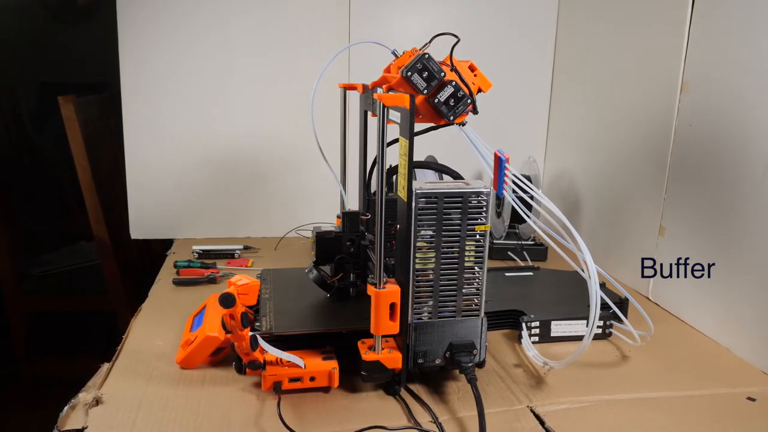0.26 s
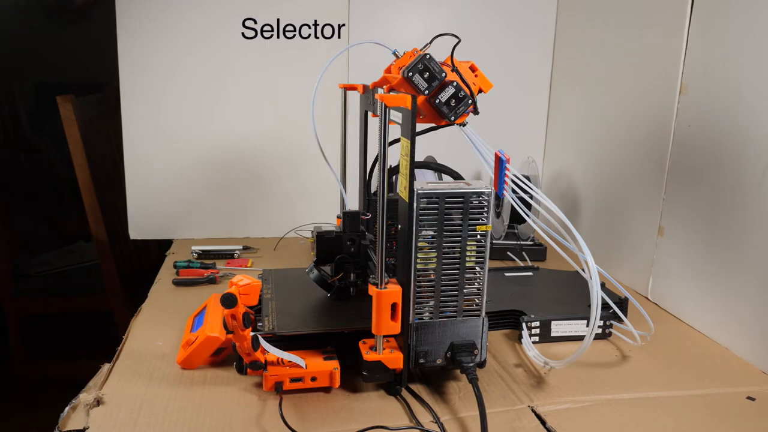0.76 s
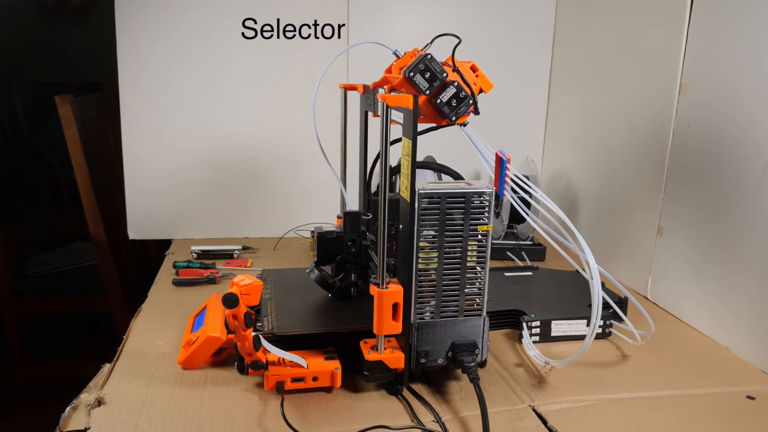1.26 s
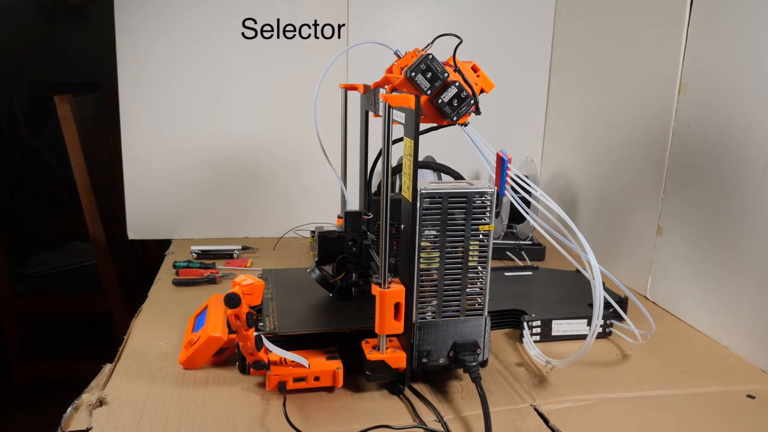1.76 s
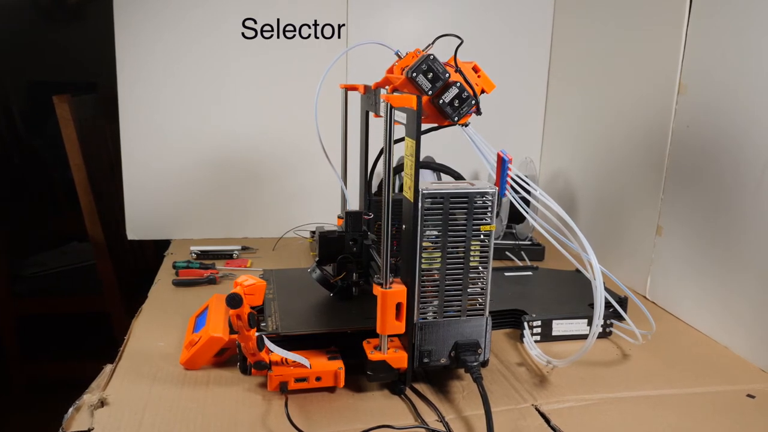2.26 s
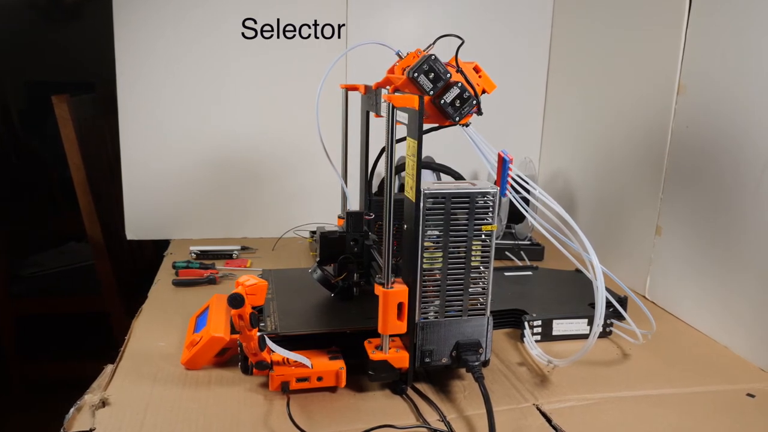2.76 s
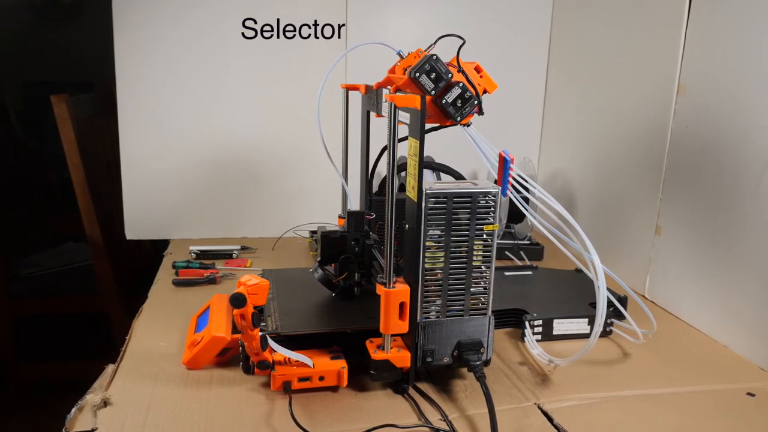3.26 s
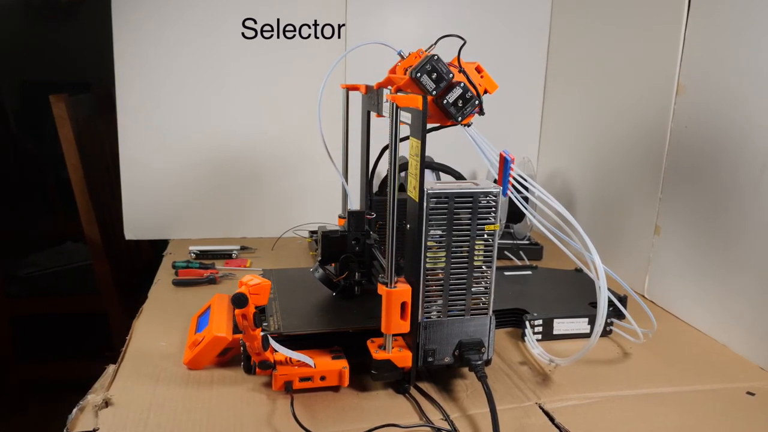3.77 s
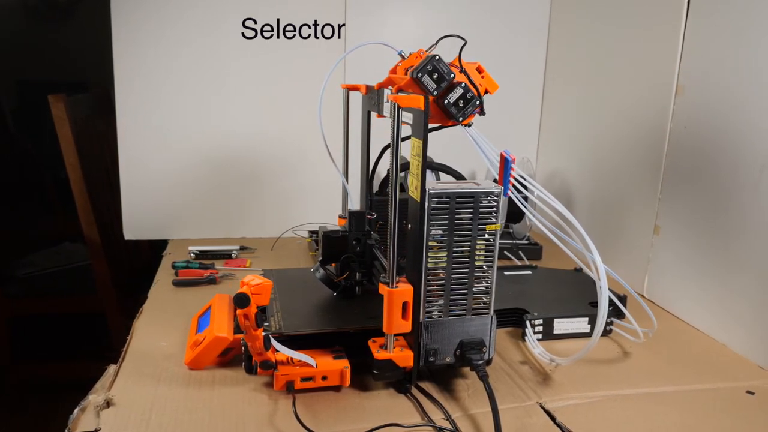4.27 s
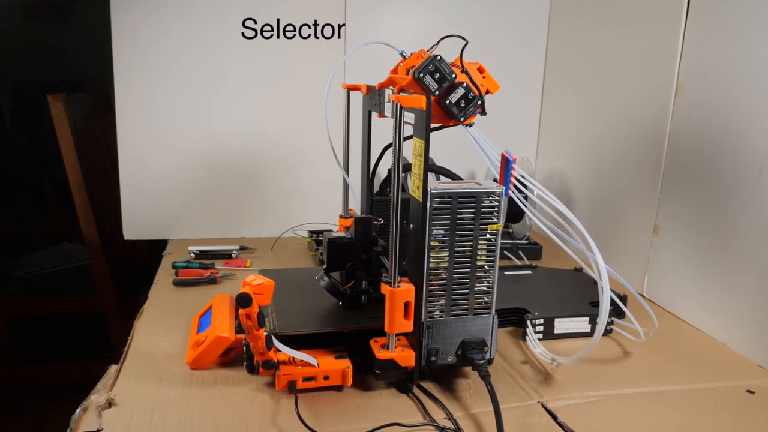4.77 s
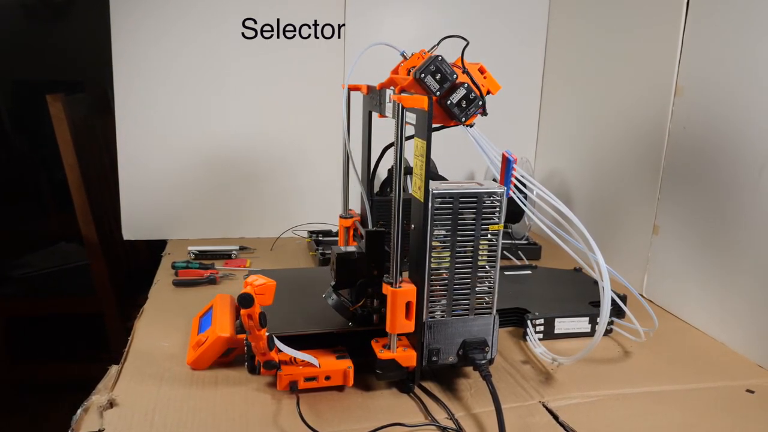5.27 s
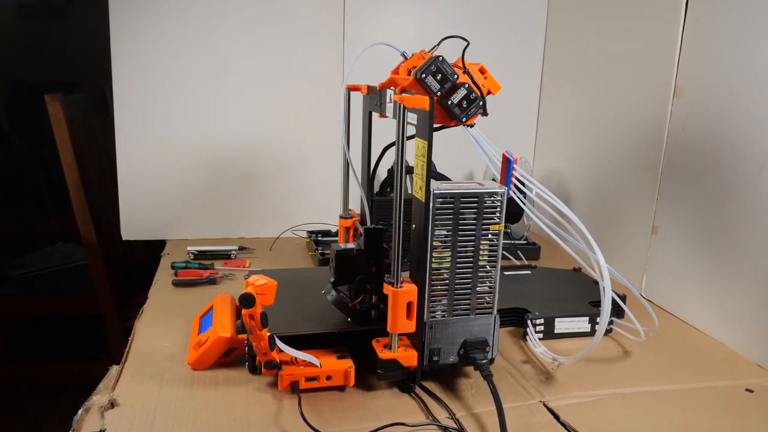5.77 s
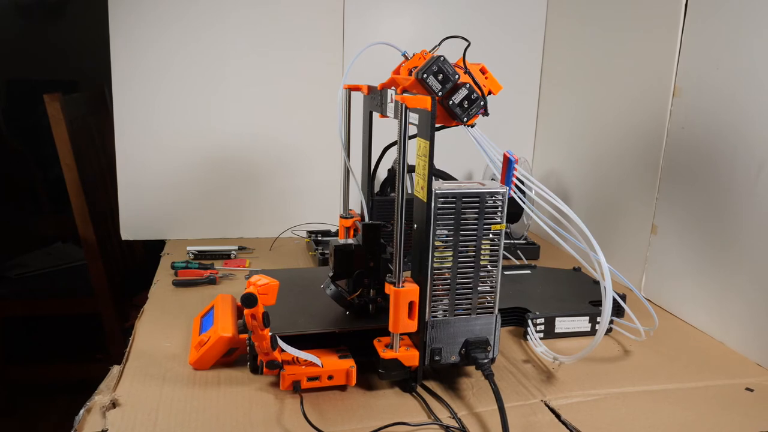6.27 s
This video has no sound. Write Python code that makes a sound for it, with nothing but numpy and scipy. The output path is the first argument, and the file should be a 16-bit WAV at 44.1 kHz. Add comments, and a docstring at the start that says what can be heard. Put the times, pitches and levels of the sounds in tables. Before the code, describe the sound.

A 3D printer on a table in a quiet small room: stepper motors give brief, uneven mid-pitched buzzes, mixed with dry plastic clicks and faint scrapes over a soft fan rush. Late on, one louder, faster move rasps up, whines steadily with bright bearing rattle, slows and stops in a hard double-pitched judder. A faint low motor hum and the fan remain. Close stereo pickup, strongly left.

```python
"""Stepper motors of a 3D printer on a table in a small room: short moves buzz through the frame as runs of sines.
One fast travel adds motor rasp on the ramps, a step tone and bearing rattle at cruise; the axes stop with a judder.
Filament feed: noise clicks through plastic resonances, rough scrapes. Drivers: thin hiss and gliding whistles.
Background: fan of shaped noise with faint tones; a slow motor hums on two orders at the end."""
import sys
import numpy as np
from scipy import signal
from scipy.fft import rfft, irfft
from scipy.io import wavfile
from scipy.ndimage import uniform_filter1d

SR = 44100
rng = np.random.default_rng(int(sys.argv[2]) if len(sys.argv) > 2 else 0)


def store_pcm(level_fs):
    """Save levels as 16-bit WAV."""
    pcm = np.round(np.clip(level_fs, -1, 1) * 32767).astype(np.int16)
    wavfile.write(sys.argv[1], SR, np.atleast_2d(pcm).T)


N = 287514
T = np.arange(N) / SR
BINS_HZ = np.maximum(np.arange(N // 2 + 1) * SR / N, 1)

# light carriage twitches: t/s, length/s, f/Hz, level/dB, fade per stroke/dB
TWITCHES = [(0.106, .048, 571, -42.5, 1), (0.171, .042, 572, -46, -1.5), (0.249, .037, 569, -40.5, 0),
            (.297, 0.024, 560, -45, -2), (.385, 0.019, 565, -45, 0), (.413, 0.027, 562, -40.5, 0),
            (.553, .028, 558, -46, 0), (.595, 0.035, 565, -42.5, 0), (.715, 0.029, 560, -43, -5),
            (1.164, 0.022, 605, -38.5, 0), (1.185, .05, 573, -37, 8.5), (1.262, 0.033, 564, -43, 0),
            (1.37, 0.058, 561, -52, -1), (1.593, 0.0165, 558, -40, 0), (1.613, .045, 570, -38, 3),
            (2.043, .062, 570.6, -39.5, 2.5), (2.124, 0.035, 568, -38.5, 0), (2.178, 0.026, 587, -47, 0),
            (2.29, 0.072, 565, -55, -2), (2.756, 0.023, 577.6, -36, 0), (2.785, 0.033, 583, -50.5, 0),
            (2.865, .061, 561, -50.5, -0.5), (3.051, 0.028, 580, -39.5, 0), (3.096, .024, 561, -37, 0),
            (3.119, .044, 550, -44, 6), (3.315, 0.051, 564, -38, -0.5), (3.459, 0.029, 557, -40.5, 0),
            (3.519, .041, 558, -36, 6), (3.69, .08, 566, -48.5, 0), (3.85, 0.067, 572, -43.5, -0.5),
            (3.971, .033, 562.4, -42, 0), (4.165, 0.029, 607, -45.5, 0), (4.219, 0.069, 560.2, -34, 5),
            (4.391, 0.032, 556, -36.5, 0), (4.436, 0.03, 564, -37, 0), (4.73, .068, 552, -37, 1),
            (4.86, .1, 551, -38, 0), (5.032, 0.083, 561.6, -38, -1.5)]
# heavy bed lurches: t/s, length/s, level/dB
LURCHES = [(0.386, 0.032, -41.5), (0.641, 0.051, -48), (0.898, 0.036, -46.5), (1.385, 0.022, -41),
           (1.594, 0.028, -46), (1.806, 0.044, -41.5), (3.327, 0.016, -46.5), (3.512, .026, -43.5),
           (4.33, 0.033, -41.5), (4.4, 0.032, -43), (4.664, 0.055, -43), (5.156, 0.028, -37),
           (5.246, 0.018, -40)]
# both axes stop hard and judder: t/s, length/s, carriage level/dB, bed level/dB
JUDDER = [(5.457, 0.0078, -27.5, -26.5), (5.474, 0.016, -42, -25.5), (5.496, 0.0148, -34, -28)]
# parts chattering along with a move: f/Hz, width/Hz, level/dB
LOOSE_PARTS = [(610, 26, 3.5), (710, 28.6, 0.5), (761, 16, -5), (945, 80, -10.5), (1152, 30, -18)]
# frame resonances: f/Hz, width/Hz, level/dB
FRAME_LOW = [(155.5, 15.3, -9.5), (238.3, 10.4, 2), (294.3, 22.7, -4.5)]
FRAME_HIGH = [(432, 14.7, -5.5), (455, 13, -29), (562.4, 16.6, 11), (643, 19.6, 0), (710, 43, -4),
              (961, 73, -14.5), (1119, 44, -8)]
# frame trembling, before gain: t/s, upper modes level/dB, low modes level/dB
TREMBLE = [(0.0, -70.5, -68), (0.14, -63, -70), (0.29, -66.5, -75), (0.6, -56, -65), (0.87, -69, -68),
           (1.18, -72, -66.5), (1.37, -64, -66.5), (1.89, -65.5, -64), (2.21, -59, -64), (2.54, -72, -66.5),
           (3.33, -63, -66), (3.75, -62.5, -62.5), (4.09, -53.5, -56.5), (4.49, -60.5, -59),
           (4.72, -52.5, -51.5), (4.93, -51.5, -56.5), (5.14, -51.5, -53), (5.8, -70, -62.5)]
STROKE_S, STROKE_GAP_S = 0.025, 0.0018  # a twitch is a run of strokes about this long
BED_HZ, JUDDER_CARRIAGE_HZ, JUDDER_BED_HZ = 245.4, 576, 265.1
SHAKE_T60_S = 0.1  # frame settling after each move
CREEP_FADE_S = 0.4  # low trembling dies away once the axes have stopped

# fast travel; speed in full steps per s
TRAVEL_START_S, TRAVEL_END_S = 4.487, 5.335
ACCEL_HZ_PER_S, CRUISE_HZ = 5500, 1091
WHINE_ON_S, WHINE_OFF_S, WHINE_EDGE_S = 4.683, 5.155, 0.037
# step tone at cruise: t/s, level/dB
WHINE = [(4.71, -33), (4.904, -39), (5.062, -37), (5.14, -38.5)]
# step tone orders: multiple of speed, relative level/dB
STEP_ORDERS = [(1, 0), (2, -37), (7, -34)]
# bearing rattle spectrum: f/Hz, relative density/dB per Hz
BEARINGS = [(1300, -12), (1600, -15), (2400, -13), (2750, -3), (3300, -2.5), (3950, -1.5), (4250, -12.5),
            (4700, -24), (5200, -33), (6300, -16), (7300, -28), (8500, -24), (10200, -41.5), (13000, -32.5),
            (15500, -22)]
RATTLE_DB, RATTLE_POWER = -44.5, 3.5  # at cruise; amplitude grows as this power of speed
# mounts rung by motor orders on the ramps: f/Hz, width/Hz, level/dB
RAMP_MODES = [(1444, 44, -3), (2900, 360, 0.5)]
# bed resonances rung by its groaning motor: f/Hz, width/Hz, level/dB
BED_MODES = [(146, 93, 6), (261, 30, 3), (398, 90, 1)]
ROUGH_SPEED_HZ, ROUGH_SPAN_HZ = 635, 147  # the motor runs roughest around this speed
BED_SPEED_SHARE, BED_GROAN_DB, BED_ROUGH_HZ = 0.41, -46, 80  # groan level before the bed resonances, in dB
BRAKING_DB = -7.5  # rasp and groan are softer while braking
# carriage rattling in its play on each ramp: t/s, length/s, level/dB
PLAY = [(4.603, 0.026, -47.5), (5.229, .026, -45)]
PLAY_HZ = 1456

# feed clicks: t/s, level/dB, body below 4.5 kHz against snap/dB, brightest f/Hz of the snap
CLICKS = [(0.6292, -41, -5, 7900), (0.6676, -53, 0, 7850), (1.1244, -46.5, -8.5, 6870),
          (1.2293, -41, -9, 7580), (1.339, -43.5, -5.5, 8350), (1.5817, -39.5, -7.5, 7725),
          (2.3754, -41.5, -4.5, 8030), (2.7112, -46, -7.5, 7650), (2.819, -49, -1.5, 8400),
          (3.0115, -43.5, -7.5, 8600), (3.2784, -56.5, 8, 8310), (3.4981, -40, -11, 8040),
          (3.7148, -49, -0.5, 6020), (3.7861, -44, -6, 6000), (3.931, -50.5, 2.5, 7260),
          (4.03, -47.5, -7.5, 6400), (4.134, -50.5, -3, 7200), (4.5395, -43.5, -4, 8080),
          (5.4803, -55.5, 1, 5300)]
# plastic resonances of snap and body: f/Hz, width/Hz, level/dB
SNAP_MODES = [(5020, 340, 3.5), (6250, 290, 4.5), (6870, 400, 0.5), (8160, 117, 6), (10500, 170, -29)]
BODY_MODES = [(1100, 113, 16.5), (1850, 430, 9), (2515, 230, 11.5), (3440, 380, 11.5)]
# filament rubbing in its guide: t/s, length/s, level/dB
SCRAPES = [(1.119, 0.042, -60), (1.59, 0.044, -57.5), (2.01, 0.046, -57), (2.721, 0.049, -56),
           (3.038, 0.028, -60.5), (3.277, 0.056, -62), (3.524, 0.041, -62), (3.929, 0.022, -54.5),
           (4.154, 0.36, -64)]
SCRAPE_HZ = 3297

CHOPPER_HZ = 19800  # driver switching rate
# whistles below the chopper: multiple of speed, level/dB
SIDEBANDS = [(9, -61), (11, -55.5), (13, -60.5)]
DRIVER_CRUISE_DB, DRIVER_HOLD_DB, HOLD_FADE_DB_PER_S = -64, -72, 1
NUDGE_S, NUDGE_LENGTH_S, NUDGE_SPEED_HZ, NUDGE_DB = 5.358, 0.077, 439, 7.5  # small move after the travel

# slow closing move
SLOW_HZ, SLOW_START_S, SLOW_ATTACK_S, SLOW_SETTLE_S = 134.3, 5.5, 0.021, 0.18
SLOW_KICK_DB, SLOW_FIRST_DB, SLOW_SECOND_DB = -55, -69.5, -61  # first order: initial extra, settled; second order

# spectra of fan rush and hiss: f/Hz, relative density/dB per Hz
FAN = [(18, -63), (30, -25.5), (135, -10), (187, -11.5), (250, -8.5), (353, -7), (540, -14.5), (667, -16.5),
       (874, -16), (1060, -10.5), (1960, -19.5), (2620, -26.5), (3000, -43), (3900, -65), (6600, -120)]
FAN_HISS = [(2400, -2), (2800, -3), (3100, -9), (3500, 0.5), (3800, 1.5), (4150, -6.5), (4600, -16.5),
            (6300, -20.5), (9000, -22), (10800, -26.5), (12200, -15.5), (14000, -21), (15800, -17.5)]
# fan hiss: t/s, level/dB
HISS_DB = [(0, -65.5), (2.6, -65), (5.6, -62.5), (6.52, -65.5)]
# faint fan tones: f/Hz, level/dB
FAN_LINES = [(244, -69.5), (489, -73.5), (1066, -79), (1405, -78), (2510, -79.5), (3760, -79.5)]
FAN_RUSH_DB = -65

ROOM_T60_S = 0.45
# stereo image drifting toward the middle: t/s, left minus right level/dB
IMAGE = [(4.9, 13.5), (5.4, 10.5)]
# extra lead of left over right: f/Hz, level/dB
LEFT_LEAD = [(60, -1.5), (250, 0), (560, 1), (900, 0), (1090, 2), (1400, -0.5), (5000, 0), (14000, 0)]
CUTOFF_HZ = 15830


def from_db(db):
    """Decibels to gain."""
    return 10 ** (np.asarray(db) / 20)


def rms_one(x):
    """Scale to unit power."""
    return x / np.sqrt(np.mean(x ** 2) + 1e-20)


def in_time(rows):
    """Interpolate each column over time."""
    s, *columns = np.transpose(rows)
    return [np.interp(T, s, c) for c in columns]


def on_bins(points):
    """Interpolate a spectrum on a log-frequency axis."""
    hz, value = np.transpose(points)
    return np.interp(np.log(BINS_HZ), np.log(hz), value)


def coloured(x, spectrum):
    """Shape by a spectrum that falls steeply past its ends; rms 1."""
    below = (spectrum[0][0] / BINS_HZ) ** 8
    above = (BINS_HZ / spectrum[-1][0]) ** 16
    skirts = 1 / np.sqrt((1 + below) * (1 + above))
    return rms_one(irfft(rfft(x) * from_db(on_bins(spectrum)) * skirts, N))


def drift(rate_hz):
    """Low-passed noise: smooth chance with spread 1."""
    return rms_one(irfft(rfft(rng.standard_normal(N)) / (1 + (BINS_HZ / rate_hz) ** 4), N))


def running_phase(hz):
    """Integrate a frequency curve to radians."""
    return 2 * np.pi * np.cumsum(hz) / SR


def window(start_s, end_s, edge_s):
    """Rise, hold and fall, with the edges centred on start and end."""
    return np.clip(np.minimum(T - start_s, end_s - T) / edge_s + 0.5, 0, 1)


def resonate(x, modes):
    """Parallel two-pole resonances with alternating signs."""
    out = 0
    for k, (hz, width_hz, db) in enumerate(modes):
        r = np.exp(-np.pi * width_hz / SR)
        poles = [1, -2 * r * np.cos(2 * np.pi * hz / SR), r * r]
        ring = signal.lfilter([1, 0, -1], poles, x + 1e-18)
        out = out + (-1) ** k * from_db(db) * (1 - r * r) / 2 * ring
    return out


def dense_modes(x, ring_s, share):
    """Many close resonances of rods and panels leave a fine, steady ripple in the spectrum."""
    t = T[:SR // 5]
    tail = rng.standard_normal(len(t)) * np.exp(-t / ring_s)
    return rms_one(x + share * signal.fftconvolve(x, tail / np.linalg.norm(tail))[:N])


def jolts(per_s, spread_db):
    """Random small impacts of uneven strength."""
    hits = rng.random(N) < per_s / SR
    return hits * rng.choice([-1, 1], N) * from_db(spread_db * rng.standard_normal(N))


def evened(x, size):
    """Hold the power steady over about size samples."""
    power = np.maximum(uniform_filter1d(rms_one(x) ** 2, size), 0)
    return x / np.sqrt(power + 1e-3) / np.sqrt(np.mean(x ** 2))


def short_moves(edge_cycles=4, glide=0.021, droop_db=3.0, chatter_db=-12, ring_db=-17, throb=0.1):
    """Each stroke is a run of steps that slows a little; loose parts chatter along and the frame rings on."""
    buzz, shake = np.zeros(N), np.zeros(N)
    for s, length_s, hz, db in strokes():
        edge_s = edge_cycles / hz  # the heavier, lower part is slower to start and stop
        i = np.flatnonzero(abs(T - s - length_s / 2) < length_s / 2 + edge_s)
        t = T[i] - s
        along = t / length_s - 0.5
        gate = np.clip(np.minimum(t, length_s - t) / edge_s + 0.5, 0, 1)
        level = from_db(db - droop_db * along) * np.sin(gate * np.pi / 2) ** 2
        phase = running_phase(hz * (1 - glide * along)) + rng.uniform(0, 2 * np.pi)
        buzz[i] += level * np.sin(phase)
        shake[i] += level * (hz / LOOSE_PARTS[0][0]) ** 2  # faster steps shake harder
    buzz *= 1 + throb * drift(49)
    chatter = evened(resonate(jolts(700, 0.52), LOOSE_PARTS), size=500) * shake
    ringing = np.roll(resonate(buzz, FRAME_LOW + FRAME_HIGH), round(0.012 * SR))
    return buzz + from_db(chatter_db) * chatter + from_db(ring_db) * ringing + tremble(shake)


def strokes(scatter=0.0064):
    """Split moves into strokes of carriage and bed: s, length s, Hz, dB."""
    for s, length_s, hz, db, fade_db in TWITCHES:
        count = max(1, round(length_s / STROKE_S))
        step_s = length_s / count
        for k in range(count):
            stroke_hz = hz * (1 + scatter * rng.standard_normal())
            yield s + k * step_s, step_s - STROKE_GAP_S, stroke_hz, db - k * fade_db
    for s, length_s, db in LURCHES:
        yield s, length_s, BED_HZ, db
    for s, length_s, carriage_db, bed_db in JUDDER:
        yield s, length_s, JUDDER_CARRIAGE_HZ, carriage_db
        yield s, length_s, JUDDER_BED_HZ, bed_db


def tremble(shake, high_gain_db=2, low_gain_db=1, high_stir_db=-12, low_stir_db=-18):
    """Single steps of the creeping motors nudge the frame's modes, more strongly in the wake of a move."""
    high_db, low_db = in_time(TREMBLE)
    r = from_db(-60 / (SHAKE_T60_S * SR))
    stirred = signal.lfilter([1 - r], [1, -r], shake + 1e-18)
    high = evened(resonate(jolts(220, 4.8), FRAME_HIGH), size=2200)
    low = evened(resonate(jolts(200, 2.2), FRAME_LOW), size=3000)
    creep_fade = np.exp(-np.maximum(T - SLOW_START_S, 0) / CREEP_FADE_S)
    high_level = np.hypot(from_db(high_db + high_gain_db), from_db(high_stir_db) * stirred)
    low_level = np.hypot(from_db(low_db + low_gain_db) * creep_fade, from_db(low_stir_db) * stirred)
    return high_level * high + low_level * low


def travel_speed():
    """Full steps per second: steady acceleration, cruise, steady braking."""
    return np.clip(ACCEL_HZ_PER_S * np.minimum(T - TRAVEL_START_S, TRAVEL_END_S - T), 0, CRUISE_HZ)


def travel():
    """Fast travel: step tone at cruise plus bearing rattle that grows with speed."""
    speed_hz = travel_speed()
    return step_tone(speed_hz) + bearing_rattle(speed_hz)


def step_tone(speed_hz, wobble=0.0033, edge_wobble=0.05, flutter=0.15, belt_hz=97, belt=0.18):
    """The step rate builds up in the frame at cruise; the swaying belt adds a side tone."""
    settled = window(WHINE_ON_S, WHINE_OFF_S, WHINE_EDGE_S) ** 2
    phase = running_phase(speed_hz * (1 + (wobble + edge_wobble * (1 - settled)) * drift(89)))
    tone = sum(from_db(db) * np.sin(k * phase) for k, db in STEP_ORDERS)
    tone += belt * np.sin(phase - running_phase(belt_hz * (1 + drift(23) / 10)))
    return np.sqrt(2) * from_db(in_time(WHINE)[0]) * settled * (1 + flutter * drift(110)) * tone


def bearing_rattle(speed_hz, flicker_db=1.4, patchy_db=2.5):
    """Balls of the linear bearings rattle along the rods, whose resonances come and go as the carriage slides."""
    balls = rfft(dense_modes(coloured(jolts(7000, 2.7), BEARINGS), ring_s=0.012, share=0.4))
    edges_hz = np.geomspace(1000, 16000, num=21)
    rattle = np.zeros(N)
    for low_hz, high_hz in zip(edges_hz, edges_hz[1:]):
        band = irfft(balls * (BINS_HZ >= low_hz) * (BINS_HZ < high_hz), N)
        rattle += band * from_db(patchy_db * drift(23))
    level = (speed_hz / CRUISE_HZ) ** RATTLE_POWER * from_db(RATTLE_DB + flicker_db * drift(99))
    return rms_one(rattle) * level


def ramp_rasp(rasp_db=-44, rough_hz=380, whistle_db=-53, whistle_width_hz=400, whistle_above_hz=760,
              whistle_order=6.86):
    """Under the load of changing speed, rough motor orders sweep through the mounts; the slower bed motor groans."""
    speed_hz = travel_speed()
    phase = running_phase(speed_hz)
    loaded = uniform_filter1d(1. * (speed_hz < CRUISE_HZ), size=900)
    orders = sum(drift(rough_hz) * np.sin(k * phase) for k in range(2, 7))
    roughness = np.exp(-((speed_hz - ROUGH_SPEED_HZ) / ROUGH_SPAN_HZ) ** 2)
    rasp = from_db(rasp_db) * roughness * resonate(orders, RAMP_MODES)
    fast = uniform_filter1d(1. * (speed_hz > whistle_above_hz), size=900)
    whistle = from_db(whistle_db) * fast * drift(whistle_width_hz) * np.sin(whistle_order * phase)
    bed_drive = speed_hz / CRUISE_HZ * drift(BED_ROUGH_HZ) * np.sin(BED_SPEED_SHARE * phase)
    groan = from_db(BED_GROAN_DB) * resonate(bed_drive, BED_MODES)
    braking = from_db(BRAKING_DB * (T > WHINE_OFF_S))
    return loaded * (whistle + braking * (rasp + groan))


def carriage_play(width_hz=170, edge_s=0.017):
    """A brief hollow rattle as the pull of the belt changes: narrow noise around one pitch."""
    level = sum(from_db(db) * window(s, s + length_s, edge_s) for s, length_s, db in PLAY)
    return level * drift(width_hz) * np.sin(2 * np.pi * PLAY_HZ * T)


def clicks(snap_db=2, body_db=6, attack_s=0.00054, crack_s=0.0013, tail_s=0.012, tail_db=-16,
           focus_db=8, focus_width_hz=350):
    """Plastic parts of the feed snap over and rattle briefly; each snap favours a pitch of its own."""
    out, t = np.zeros(N), T[:SR // 12]
    decay = np.exp(-t / crack_s) + from_db(tail_db) * np.exp(-t / tail_s)
    shape = decay * (1 - np.exp(-t / attack_s))
    for s, db, weight_db, hz in CLICKS:
        contact = from_db(db) * shape * rng.standard_normal(len(t))
        snap = resonate(contact, SNAP_MODES + [(hz, focus_width_hz, focus_db)])
        body = resonate(contact, BODY_MODES)
        i = round(s * SR) + np.arange(len(t))
        out[i] += from_db(snap_db) * snap + from_db(body_db + weight_db) * body
    return out


def scrapes(width_hz=600, body_db=-3):
    """Filament rubs swell and fade: rough noise around one pitch and in the plastic body."""
    out, grain = np.zeros(N), drift(width_hz)
    body = from_db(body_db) * rms_one(resonate(jolts(3800, 1.2), BODY_MODES))
    for s, length_s, db in SCRAPES:
        i = np.flatnonzero((T > s) & (T < s + length_s))
        swell = from_db(db) * np.sin(np.pi * (T[i] - s) / length_s)
        out[i] += swell * (grain[i] * np.sin(2 * np.pi * SCRAPE_HZ * T[i]) + body[i])
    return out


def drivers(driver_hz=15620, driver_width_hz=300, flicker_db=2.0, sideband_width_hz=650,
            quiet_above_hz=850, fade_hz=200):
    """The drivers hiss; at low speeds their sidebands come into hearing, the lower the faster the motor turns."""
    nudge = window(NUDGE_S, NUDGE_S + NUDGE_LENGTH_S, 0.03)
    speed_hz = travel_speed() + NUDGE_SPEED_HZ * np.sqrt(nudge)
    moving = from_db(DRIVER_CRUISE_DB) * speed_hz / CRUISE_HZ
    age_s = T - SLOW_START_S
    holding = from_db(DRIVER_HOLD_DB - HOLD_FADE_DB_PER_S * age_s) * (age_s > 0)  # eases in the slow move
    level = (moving + holding) * from_db(flicker_db * drift(25))
    hiss = np.sqrt(2) * level * drift(driver_width_hz) * np.sin(2 * np.pi * driver_hz * T)
    whistles = sum(from_db(db) * drift(sideband_width_hz) * np.sin(running_phase(CHOPPER_HZ - k * speed_hz))
                   for k, db in SIDEBANDS)
    slow = np.clip(np.minimum(speed_hz, quiet_above_hz - speed_hz) / fade_hz, 0, 1)
    return hiss + slow * from_db(NUDGE_DB * nudge) * whistles


def slow_motor(waver=0.0048, flutter_db=2):
    """A slowly turning motor hums on two orders; the first starts strong and settles as the second grows."""
    age_s = np.maximum(T - SLOW_START_S, 0)
    kick = np.exp(-age_s / SLOW_SETTLE_S)
    phase = running_phase(SLOW_HZ * (1 + waver * drift(7.0)))
    first = (from_db(SLOW_KICK_DB) * kick + from_db(SLOW_FIRST_DB)) * np.sin(phase)
    second = from_db(SLOW_SECOND_DB) * (1 - kick) * np.sin(2 * phase)
    attack = np.minimum(age_s / SLOW_ATTACK_S, 1)
    return np.sqrt(2) * attack * (first + second) * from_db(flutter_db * drift(9.8))


def fan(waver=0.00282):
    """Rushing air as shaped noise, with faint tones wavering together."""
    rush = from_db(FAN_RUSH_DB) * coloured(rng.standard_normal(N), FAN)
    hiss = dense_modes(coloured(rng.standard_normal(N), FAN_HISS), ring_s=0.0058, share=0.65)
    spin = running_phase(1 + waver * drift(13.2))  # phase per Hz of tone
    tones = np.sqrt(2) * sum(from_db(db) * np.sin(hz * spin) for hz, db in FAN_LINES)
    return rush + from_db(in_time(HISS_DB)[0]) * hiss + tones


def room(x):
    """A short diffuse tail: decaying noise, different at each ear."""
    t = T[:SR // 2]
    tail = rng.standard_normal((2, len(t))) * from_db(-60 * t / ROOM_T60_S) * (t > 0.006)
    tail /= np.sqrt(np.sum(tail ** 2, axis=1, keepdims=True))
    return signal.fftconvolve(x[None], tail, axes=1)[:, :N]


def scene(room_db=-20):
    """All parts of the printer sound from one place."""
    motion = short_moves() + travel() + ramp_rasp() + carriage_play()
    feed = clicks() + scrapes()
    printer = motion + feed + drivers() + slow_motor() + fan()
    return printer + from_db(room_db) * room(printer)


def record(dry, self_noise_db=-84):
    """The left channel is much stronger than the right, each has a faint hiss of its own; the top is cut."""
    lead = from_db(in_time(IMAGE)[0])
    placed = dry * 2 * np.array([lead, np.ones(N)]) / (1 + lead)
    placed += from_db(self_noise_db) * rng.standard_normal((2, N))
    colour = from_db(on_bins(LEFT_LEAD) * [[0], [-1]])  # left kept, lead taken off the right
    top = np.clip((CUTOFF_HZ - BINS_HZ) / 150 + 0.5, 0, 1)
    return irfft(rfft(placed) * colour * top, N)


dry = scene()
out = record(dry)
store_pcm(out)
```